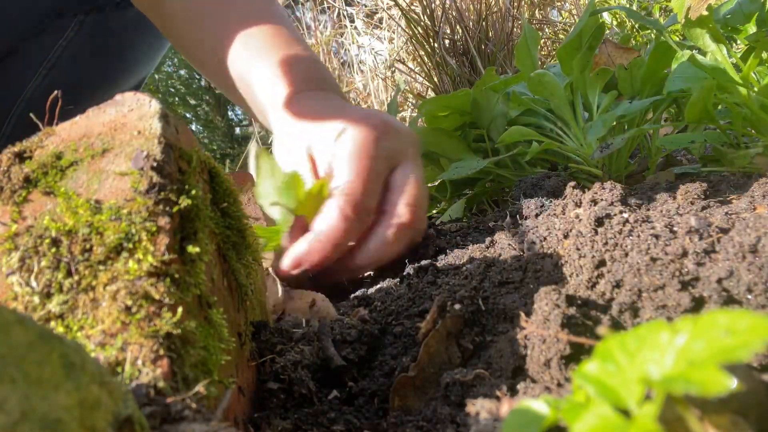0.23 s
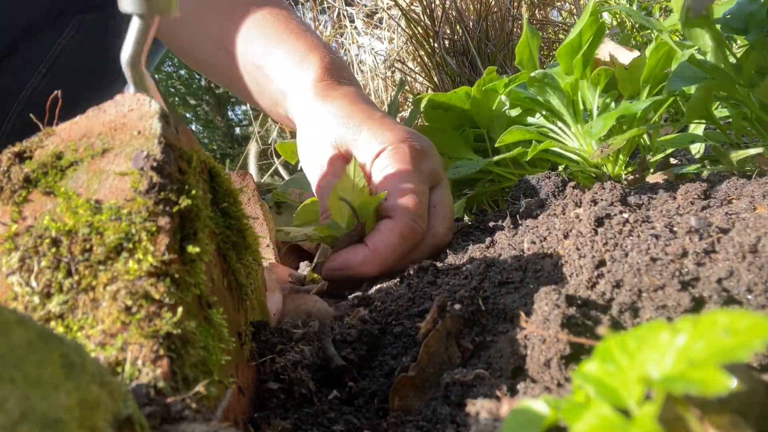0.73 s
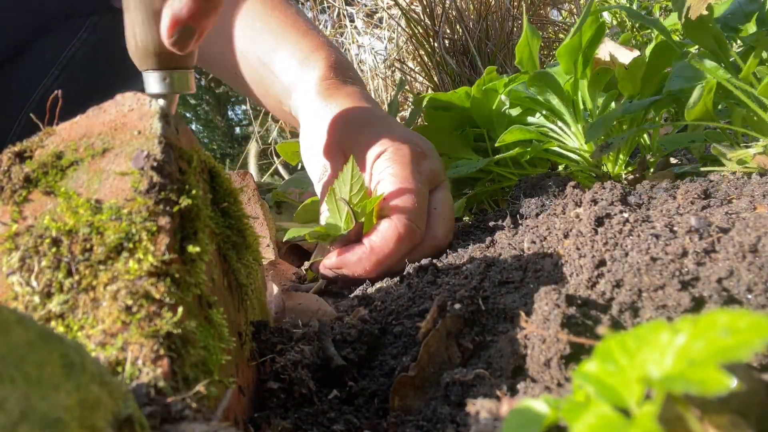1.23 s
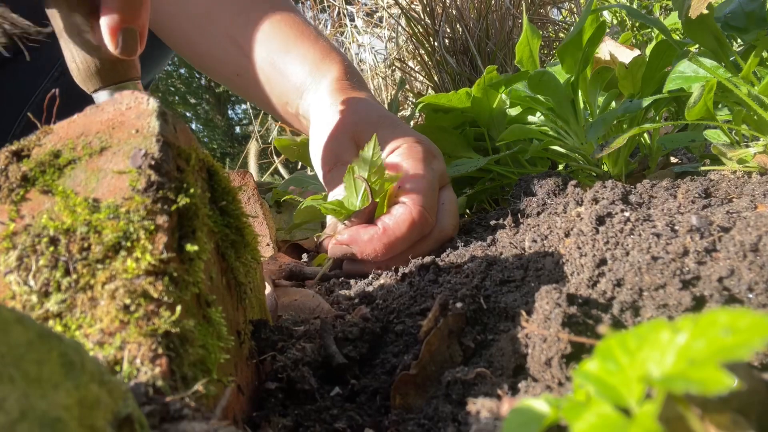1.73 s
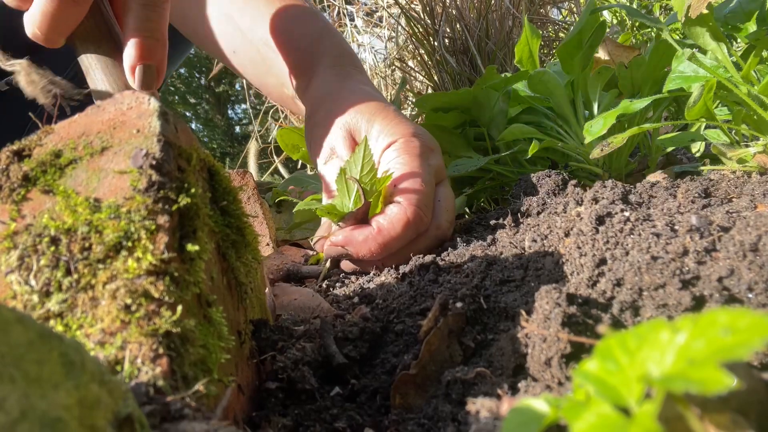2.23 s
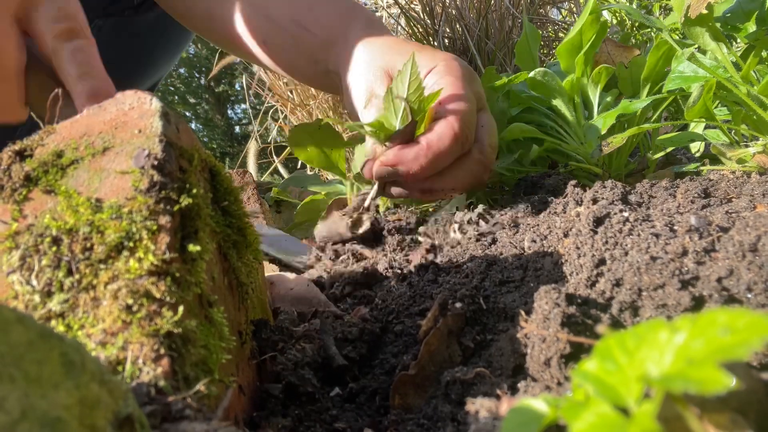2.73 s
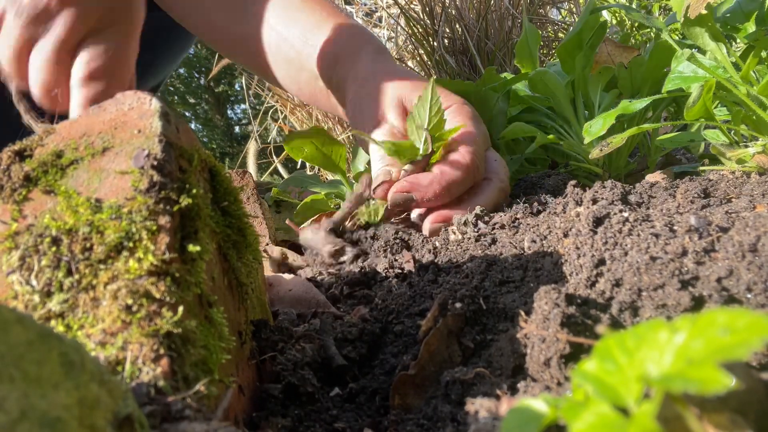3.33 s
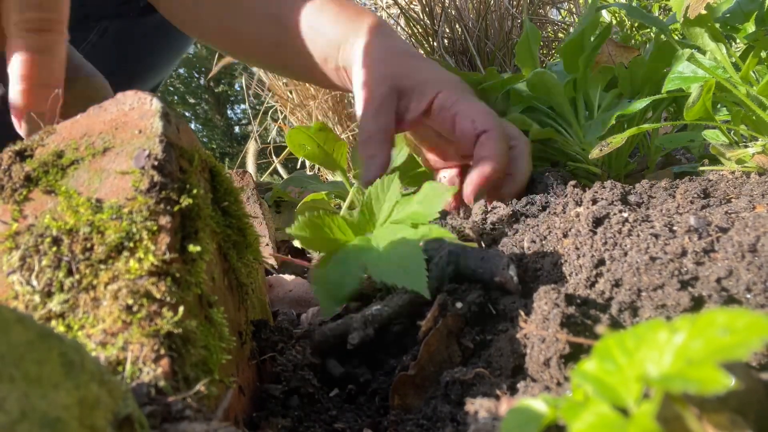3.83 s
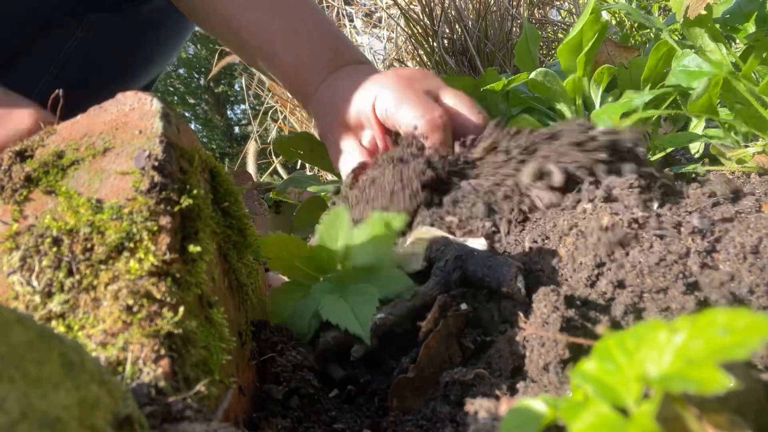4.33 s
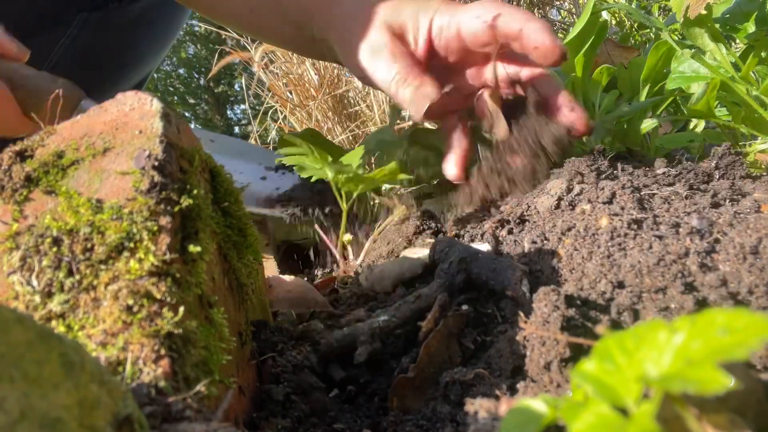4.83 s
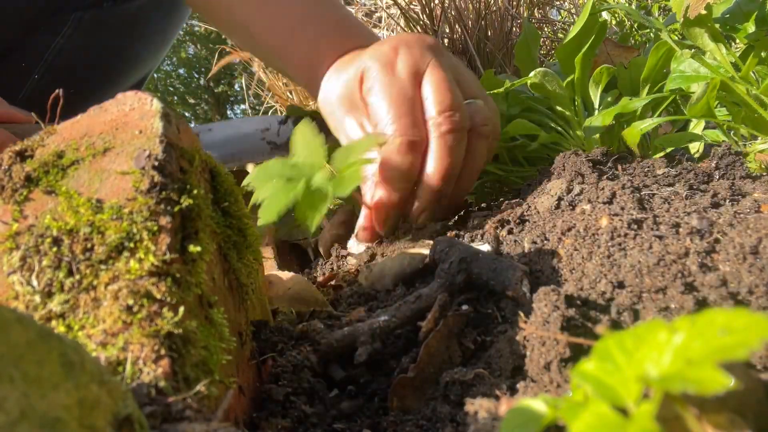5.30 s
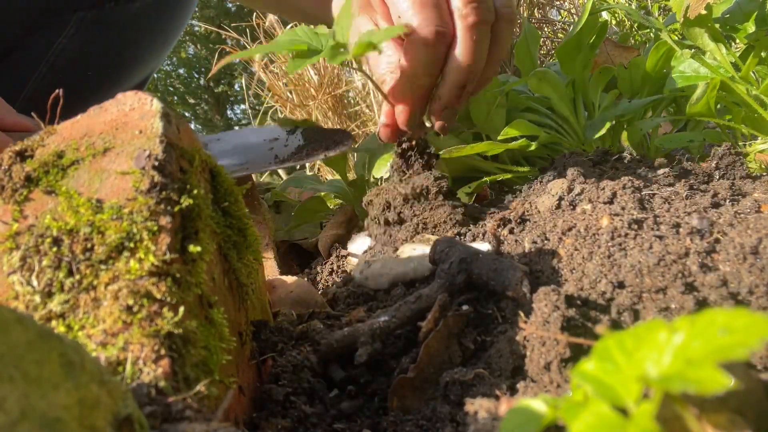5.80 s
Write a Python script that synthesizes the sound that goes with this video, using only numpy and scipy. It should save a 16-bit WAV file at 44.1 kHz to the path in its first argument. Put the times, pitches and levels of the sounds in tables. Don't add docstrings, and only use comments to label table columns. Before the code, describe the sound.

A ground-level, close stereo sound of digging in a garden, over a low, far town rumble and faint airy hush. From 0 s hands rustle gritty soil, with a crisp root snap at 0.14, then a lull. A soft bee drone near 168 Hz hovers, comes nearest around 1.2 and is gone by 2.1. From 0.7 to 1.4 crumbling slides, small snaps and dropping crumbs return, thinning until a very loud, dry crack at 2.5. At 2.9 a trowel clinks on stone; from 3.0 to 4.2 come heavier pushes, dull clods, popping roots, dragging metal and bright pebble ticks. A sharp ringing blade knock lands at 4.62. Thin high whistles at 4.5 lead into a distant songbird's quick, slurred warble from 4.8 to 5.6, with slight tree echo, while a few thuds, a faint soil heave and tiny ticks fade towards 6 s.

```python
import sys
import numpy as np
from scipy import signal
from scipy.fft import rfft, irfft, next_fast_len
from scipy.io import wavfile
from scipy.ndimage import uniform_filter1d

SR = 44100
rng = np.random.default_rng(int(sys.argv[2]) if len(sys.argv) > 2 else 0)


def field_ratio(decibels):
    return 10 ** (np.asarray(decibels, dtype=float) / 20)


def int16_out(signal):
    q = np.round(np.clip(np.atleast_2d(signal).T, -1, 1) * 32767)
    wavfile.write(sys.argv[1], SR, q.astype(np.int16))


N = 267246


def evened(x):
    return x / np.sqrt(np.mean(x ** 2) + 1e-20)


def read(points, hz):
    f, value = np.transpose(points)
    return np.interp(np.log(hz + 1), np.log(f + 1), value)


def add(mix, s, sound):
    part = mix[:, round(s * SR):][:, :sound.shape[1]]
    part += sound[:, :part.shape[1]]


def band(x, lo_hz, hi_hz):
    sos = signal.butter(N=2, Wn=[lo_hz, hi_hz], btype="band", fs=SR, output="sos")
    return signal.sosfilt(sos, x)


def coloured(x, points):
    gain_db = read(points, abs(np.fft.fftfreq(4096, 1 / SR)))
    log_gain = np.log(field_ratio(np.maximum(gain_db, -90)))
    taps = np.fft.ifft(np.exp(np.conj(signal.hilbert(log_gain)))).real[:2048]
    return signal.oaconvolve(x, taps)[:len(x)]


def panned(x, db):
    return x * field_ratio(np.array([[.5], [-.5]]) * db)


def smoothed_noise(n, size):
    return evened(uniform_filter1d(uniform_filter1d(rng.standard_normal(n), size=size), size=size))


def tail(t60_s, length_s, start_s):
    t = np.arange(round(length_s * SR)) / SR
    signs = rng.choice([-1., 1.], (2, len(t)))
    present = (rng.random((2, len(t))) < .06) * (t > start_s)
    taps = signs * present * field_ratio(-60 * t / t60_s)
    return taps / np.linalg.norm(taps, axis=1, keepdims=True)


# t/s, level/dB, left-right/dB
RUMBLE = [(0.0, -34, -0.5), (0.9, -37, 0), (1.2, -38, -2.5), (1.75, -38.5, 1.5), (2.3, -37.5, -0.5),
          (3.07, -37.5, 0), (3.62, -34, -1.5), (4.15, -38, -2.5), (4.75, -38.5, 0), (5.2, -38, -0.5),
          (5.62, -38, 0), (6.06, -35.5, 0)]
# f/Hz, density/dB per Hz
AIR = [(40, -16.5), (54, -1.5), (60, 6), (67, -1.5), (90, -6), (140, -10.5), (170, -12.5), (215, -22.5),
       (310, -21.5), (420, -36), (700, -36.5), (1100, -42.5), (2000, -49), (6500, -59), (8000, -56.5),
       (15000, -81)]
# f/Hz, likeness/1
AIR_SAME = [(40, .52), (90, 0.55), (160, 0.5), (400, 0.3), (2000, 0.1), (10000, 0.4)]
# f/Hz, phase/rad
AIR_LEAD = [(40, 0.5), (90, 0.5), (160, 2.2), (700, 2.96), (2000, 0.87)]


def air():
    hop = 512
    frames, hz = N // hop + 5, np.fft.rfftfreq(2048, 1 / SR)
    a, b, c, d, patches = rng.standard_normal((frames, 1025, 5)).T
    patches = evened(uniform_filter1d(uniform_filter1d(patches, size=10, axis=0), size=6, axis=1))

    same = read(AIR_SAME, hz)[:, None]
    lag = np.exp(-1j * read(AIR_LEAD, hz)[:, None])
    left = a + 1j * b
    right = same * left * lag + np.sqrt(1 - same ** 2) * (c + 1j * d)

    s, db, place_db = np.transpose(RUMBLE)
    swell_db = np.interp(np.arange(frames) * hop / SR, s, db - db.mean())
    bass_swell_db = swell_db / (1 + (hz[:, None] / 250) ** 4)
    z = np.array([left, right]) * field_ratio(read(AIR, hz)[:, None] + 2.43 * patches + bass_swell_db)
    out = signal.istft(z, nperseg=2048, noverlap=2048 - hop)[1][:, :N]
    return panned(field_ratio(db.mean() + 2.0) * evened(out), np.interp(np.arange(N) / SR, s, place_db))


# t/s, length/s, f/Hz, level/dB
WHISTLES = [
    (0.458, 0.089, 4600, -77),
    (0.578, 0.11, 4090, -76.5),
    (4.488, 0.086, 8700, -64.5),
    (4.555, 0.066, 8680, -73),
    (4.633, 0.044, 8280, -63),
    (4.667, 0.04, 8060, -62),
    (4.688, 0.045, 8760, -63.5),
    (5.73, 0.069, 7480, -80),
    (5.762, .06, 8140, -78),
]
# t/s, length/s, start f/Hz, end f/Hz, level/dB
SLURS = [(4.794, 0.044, 3170, 3660, -65), (4.847, 0.026, 3940, 3230, -63.5),
         (4.863, 0.015, 2400, 2760, -72), (4.87, 0.039, 2765, 2815, -56.5), (4.921, 0.048, 3400, 3340, -62),
         (4.962, 0.024, 3400, 3760, -65), (4.979, 0.013, 3730, 4320, -55),
         (4.985, 0.0365, 3900, 4045, -59.5), (4.976, .035, 3350, 3350, -68), (5.021, 0.06, 3395, 3380, -73),
         (5.101, 0.018, 3380, 5050, -64), (5.113, 0.022, 5300, 4760, -52.5),
         (5.13, 0.022, 4790, 5260, -49.5), (5.147, 0.02, 5330, 5480, -59), (5.192, 0.046, 5100, 4820, -78),
         (5.253, 0.013, 4630, 4430, -58), (5.26, 0.0094, 4480, 5510, -63), (5.271, 0.018, 4940, 3120, -55),
         (5.307, 0.015, 3820, 3270, -61), (5.326, 0.013, 3150, 5320, -59),
         (5.402, 0.011, 3500, 4750, -56.5), (5.411, 0.0089, 4450, 3100, -56),
         (5.418, 0.015, 3100, 3690, -57), (5.431, 0.014, 3540, 3000, -56), (5.444, 0.02, 3050, 2820, -66),
         (5.469, 0.013, 3080, 4740, -59), (5.482, .006, 4430, 3200, -64), (5.536, 0.012, 2630, 3800, -63)]
# t/s, length/s, top f/Hz, level/dB
FLICKS = [
    (5.291, 0.022, 3800, -52.5),
    (5.597, 0.022, 3040, -66),
]


def song():
    sag = 0.026
    notes = [(s, n, hz * (1 + sag / 2), hz, hz * (1 - sag / 2), db) for s, n, hz, db in WHISTLES]
    notes += [(s, n, a, (a + b) / 2, b, db) for s, n, a, b, db in SLURS]
    for s, n, top_hz, db in FLICKS:
        foot_hz = 600 + 0.56 * top_hz
        notes.append((s, n, foot_hz, top_hz, foot_hz, db))
    return notes


def bird():
    out = np.zeros((2, N))
    for s, length, *hz, db in song():
        u = np.linspace(0, 2, round(length * SR))
        warble = smoothed_noise(len(u), 160)
        glide_hz = np.polyval(np.polyfit([0, 1, 2], hz, deg=2), u)
        phase = 2 * np.pi * np.cumsum(glide_hz * (1 + .017 * warble)) / SR
        swell = np.sin(np.pi * u / 2) * field_ratio(3.5 * warble[::-1])
        add(out, s, panned(field_ratio(db + 11.5) * swell * np.sin(phase), 5.1))
    trees = signal.oaconvolve(out, tail(.45, .5, .003), axes=1)[:, :N]
    return out + field_ratio(-3.5) * trees


# t/s, wingbeat f/Hz, level/dB
BEE = [
    (0, 168.5, -48),
    (.55, 166.8, -43),
    (1.25, 166.3, -42),
    (1.45, 170.5, -50),
    (1.7, 172, -51),
    (1.98, 168, -49),
    (2.1, 158, -70),
]
# level/dB, left-right/dB, left lead/rad
BEE_TONES = [(0, -4, -2.8), (-17, 3, 1.9), (-30, 4, -2.6)]


def bee():
    s, hz, db = np.transpose(BEE)
    t = np.arange(N) / SR
    waver = smoothed_noise(N, 1500)
    turn = 2 * np.pi * np.cumsum(np.interp(t, s, hz) * (1 + .004 * waver)) / SR
    tones = np.zeros((2, N))
    for multiple, (level_db, place_db, lead) in enumerate(BEE_TONES, 1):
        wave = np.sin(multiple * turn - np.array([[0], [lead]]))
        tones += panned(field_ratio(level_db) * wave, place_db)
    return np.sqrt(2) * field_ratio(np.interp(t, s, db, right=-120) + 1.5 * waver[::-1]) * tones


def drops(rows, cycles):
    out, t = np.zeros((2, N)), np.arange(4000) / SR
    for s, db, hz in rows:
        spread, place = rng.standard_normal(2)
        fade = np.exp(-t * hz * np.log(10) / cycles)
        overtone = 0.17 * np.sin(2 * np.pi * hz * (1.9 + 0.22 * spread) * t) * fade
        ring = (np.sin(2 * np.pi * hz * t) + overtone) * fade
        tick = band(rng.standard_normal(4000) * np.exp(-t / .0006), 1500, 10000)
        add(out, s, panned(field_ratio(db + 3.0) * (ring + 0.34 * tick / abs(tick).max()), 2.5 * place))
    return out


# t/s, peak/dB, f/Hz
CRUMBS = [(.05, -42, 1330), (.174, -40, 2500), (0.71, -38, 1170), (0.744, -31, 1000), (.761, -33.5, 2230),
          (0.793, -39, 2400), (.926, -46, 2000), (0.957, -39, 2600), (.974, -31, 3800),
          (1.022, -33.5, 2600), (1.096, -35, 2850), (1.244, -60, 1050), (1.358, -49, 850),
          (1.415, -43, 1200), (2.514, -38, 950), (2.516, -45, 2100), (2.526, -24, 980), (2.529, -33, 2100),
          (2.929, -42, 2900), (3.006, -35.5, 680), (3.049, -35, 2100), (3.069, -25.5, 1380),
          (3.091, -31, 2000), (3.101, -28, 2040), (3.116, -39, 2100), (3.136, -33, 2010),
          (3.137, -30.5, 4200), (3.169, -42, 2000), (3.263, -56, 900), (3.338, -31.5, 814),
          (3.488, -18.5, 5800), (3.552, -33, 6200), (3.593, -37, 2170), (3.612, -35, 800),
          (3.616, -36, 1400), (3.639, -40, 900), (3.652, -36, 950), (3.687, -39, 1700), (3.692, -43, 800),
          (3.70, -44, 1200), (3.83, -39, 900), (3.871, -42, 1190), (3.994, -31, 2370), (4.071, -34.5, 920),
          (4.199, -44, 1090), (4.211, -39, 2190), (4.247, -53, 900), (4.457, -44, 1320), (4.627, -34, 2360),
          (4.644, -30, 4100), (5.291, -50, 6500), (5.375, -42.5, 1950), (2.4968, -8, 944),
          (3.4395, -24, 720), (3.966, -21.5, 950), (5.5, -41, 600)]
# t/s, peak/dB, f/Hz
PEBBLES = [(1.479, -44.5, 1170), (1.597, -51, 1000), (1.70, -43, 4300), (1.716, -42.5, 4070),
           (2.4975, -19, 2180), (3.376, -34, 1910), (3.44, -33, 2640), (3.44, -37, 6000),
           (3.465, -32, 8600), (3.473, -19, 6040), (3.473, -22.5, 8700), (3.474, -31, 1960),
           (3.487, -36, 8700), (4.002, -35.5, 2420), (4.018, -43, 2450), (4.103, -43, 2950),
           (4.112, -43, 3080), (4.316, -36, 2040), (4.345, -47, 2000), (2.881, -30.5, 1447),
           (4.6225, -16.5, 4260), (4.628, -22, 5100), (5.66, -53, 6000), (5.71, -57, 8500),
           (5.735, -68, 4300), (5.823, -53, 4800), (5.853, -58, 3820)]
# t/s, peak/dB, f/Hz
LUMPS = [(.327, -49, 7800), (.371, -39, 8700), (.394, -41, 8580), (.4655, -47, 8900), (.58, -55, 7700),
         (2.997, -42, 564), (3.058, -40, 415), (3.068, -32.5, 860), (3.072, -41, 400), (3.092, -37, 467),
         (3.097, -43, 1110), (3.131, -42, 490), (3.476, -38, 580), (3.478, -39, 1440), (3.895, -38, 2080),
         (3.947, -41, 516), (3.967, -35.5, 424), (4.313, -36.5, 600), (4.6203, -19, 3050),
         (4.626, -21, 2240)]


def falling_bits():
    return drops(CRUMBS, 3.24) + drops(PEBBLES, 15) + drops(LUMPS, 12.3)


# f/Hz, level/dB, t60/s
BLADE = [(455, -1, .05), (620, -7, .025), (1860, -13, .11), (2288, -4, .025), (2285, -2, .11),
         (2605, -2, .045), (3065, 1, .035), (3058, -11, .14), (4125, -4, .035), (4220, -8, .025),
         (5000, -6, .028), (6110, -10, .025), (6460, -12, .025), (7100, -12, .02), (7650, -14, .025),
         (8450, -11, .02), (9450, -12, .02), (10350, -11, .08)]


def rung(x, tilt_db, edge_db):
    t = np.arange(7000) / SR
    ring = np.zeros(len(t))
    for hz, db, t60_s in BLADE:
        level_db = db + tilt_db * np.log2(max(hz, 1800) / 2300) + edge_db * (3000 < hz < 3100)
        ring += field_ratio(level_db - 60 * t / t60_s) * np.sin(2 * np.pi * hz * t)
    return signal.oaconvolve(x, ring)[:len(x)]


# t/s, peak/dB, tilt/dB per octave, edge modes/dB
KNOCKS = [(2.8843, -23.5, 0, -21), (2.9468, -33.5, 7, -14), (3.055, -34, -10, -8), (3.096, -29, -10, 6),
          (3.472, -37, 10, 0), (3.592, -31, -4, -14), (3.6436, -25.5, -20, -17), (3.678, -36, -59, -14),
          (3.9407, -21.5, 10.5, -14), (4.6207, -7.5, -2.5, 1), (5.0962, -30, 41, -6), (5.499, -42, -38, -7)]


def knocks():
    out, t = np.zeros((2, N)), np.arange(8000) / SR
    for s, db, tilt_db, edge_db in KNOCKS:
        rub = .45 * np.exp(-t / .0008) + .1 * np.exp(-(t / .009) ** 3)
        scrape = 9 * (t == 0) + rng.standard_normal(8000) * rub
        top_hz = np.clip(10000 * 2 ** (tilt_db / 8), 2600, 16000)
        ring = evened(rung(scrape, tilt_db, edge_db)) + 0.43 * evened(band(scrape, 2050, top_hz))
        add(out, s, panned(field_ratio(db + 5.5) * ring / abs(ring).max(), -1.0))
    return out


# t/s, peak/dB, thud re peak/dB, grit re peak/dB
ROOTS = [(0.058, -34.5, -40, -21), (0.143, -13, -33.5, -5), (0.622, -53.5, -22, 11), (0.839, -29, -46, -17),
         (0.871, -31.5, -33.5, -10), (0.916, -29.5, -37, -12), (1.077, -26.5, -43, -11.5),
         (1.109, -32, -37, -6.5), (1.177, -28, -31, -7.5), (1.479, -27, -32, -8.5),
         (1.687, -37.5, -14, -5.5), (1.943, -29, -18.5, -7), (1.964, -25, -25, -5.5),
         (2.252, -33.5, -19.5, -13.5), (2.312, -28.5, -26, -21), (2.346, -31.5, -27, -14),
         (2.525, -28.5, -13, -16), (2.568, -35.5, -17, -14), (2.679, -37, -20, -10), (2.849, -31, -38, -15),
         (3.068, -16.5, -25.5, -19), (3.097, -31, -39, -14), (3.542, -34, -16.5, -2),
         (3.811, -32.5, -15.5, -20), (3.896, -25.5, -21, -14), (4.291, -32.5, -15, -14),
         (4.315, -31, -7.5, -30), (5.353, -41, -12, -26), (5.501, -38.5, -8.5, -6),
         (6.042, -38.5, -27.5, -10)]
# t/s, peak/dB, thud re peak/dB, grit re peak/dB, thud f/Hz
CLODS = [(0.729, -31, -10, -17, 1000), (1.273, -31.5, -4.5, -11, 760), (1.296, -22.5, -23, -28, 473),
         (1.596, -29, -17.5, -14, 500), (2.4965, -4.5, -40, -34, 700), (2.498, -30, 3, -25, 404),
         (2.866, -35, -9, -27, 1110), (2.88, -14, -15.5, -12.5, 830), (3.057, -20, -25, -9.5, 372),
         (3.206, -28.5, -14.5, -26, 477), (3.373, -28, -9, -31, 820), (3.387, -28.5, 1, -25, 815),
         (3.439, -24, -10, -13, 690), (3.472, -20.5, -22, -28, 565), (3.606, -22, -8, -27, 900),
         (3.644, -26.5, 0, -16, 910), (3.678, -39.5, 1.5, -20, 1240), (3.762, -25.5, -16, -14.5, 510),
         (3.938, -29, -21, -9, 456), (3.965, -24, -3.5, -23, 820), (5.095, -41.5, 3, -30, 394),
         (4.1625, -18.5, -18.5, -37, 350), (4.983, -49, -8, -21, 534), (5.094, -32, -4, -3, 1350)]


def snaps():
    out, t = np.zeros((2, N)), np.arange(2048) / SR
    root_thud_hz = 312
    when, *_, place_db = np.transpose(DIG)
    for s, db, thud_db, grit_db, body_hz in [*CLODS, *[(*row, root_thud_hz) for row in ROOTS]]:
        fade = field_ratio(-60 * t / 0.0093) + 0.067 * field_ratio(-60 * t / 0.12)
        burst = coloured(rng.standard_normal(2048) * fade, SOIL)
        thud = band(burst, 0.67 * body_hz, 1.27 * body_hz)
        tear = band(burst, 850, 6140)
        edge = band(burst, 9540, 20000)
        snap = sum(field_ratio(level_db) * part / abs(part).max() for level_db, part in
                   ((thud_db + 9.5, thud), (-2.5, tear), (grit_db + 6.0, edge)))
        add(out, s, panned(field_ratio(db) * snap, np.interp(s, when, place_db)))
    return out


def layers(effort_db, fine_db):
    thud_db = effort_db - 2 - 0.42 * fine_db
    crumble_db = effort_db - 1.86
    grit_db = effort_db - 2.2 + 0.92 * fine_db
    return field_ratio(np.array([thud_db, crumble_db, grit_db]))


def grit(per_s, spread_db, clump_db):
    clumps = evened(uniform_filter1d(rng.standard_normal(N), size=500))
    size = field_ratio(spread_db * np.minimum(rng.exponential(1, N), 3.5)) * (rng.random(N) < per_s / SR)
    clicks = evened(size * rng.standard_normal(N))
    return field_ratio(clump_db * clumps) * (clicks + 0.68 * rng.standard_normal(N))


# t/s, effort/dB, fineness/dB, left-right/dB
DIG = [(0.0, -51.5, -4.5, -15), (0.27, -52, 4, -1.5), (0.48, -88.5, 27, 12), (0.66, -77.5, 4, -10),
       (0.8, -55.5, -7, -4.5), (1.04, -53.5, -0.5, -6.5), (1.4, -58.5, -6, 2.5), (2.04, -59.5, -0.5, -3.5),
       (2.3, -64.5, -4.5, -0.5), (2.7, -55, 0, -10), (2.92, -65.5, -4, -1.5), (3.08, -49.5, -2.5, -3),
       (3.5, -54.5, 1.5, -2), (3.68, -63, -1.5, 2.5), (3.91, -49.5, -2.5, -4.5), (4.42, -53.5, 1, -4),
       (4.58, -63, 0, 6.5), (6.06, -70.5, -4, -1.5)]
# f/Hz, density/dB per Hz
SOIL = [(150, -14), (300, -2.5), (500, -2), (900, 1), (1600, -7), (2400, -11), (3500, -11), (4100, -4),
        (6000, -7.5), (8500, -12), (10500, -10.5), (14500, -25.5)]
# t/s, length/s, effort/dB, fineness/dB
HEAVES = [
    (2.97, 0.21, -48, -2),
    (3.3, 0.23, -50, 0),
    (4.03, 0.25, -59.5, -28),
    (5.09, 0.62, -64.5, -15),
    (1.61, 0.23, -68, -9),
]
# t/s, length/s, effort/dB, fineness/dB
SLIDES = [(0.054, 0.015, -54.5, 4), (0.136, 0.056, -41.5, 2.5), (0.67, 0.14, -45, 0), (.91, 0.022, -48, -7),
          (0.935, 0.18, -52, -3), (1.27, 0.065, -41, -2), (1.382, 0.061, -47, -1.5),
          (1.904, 0.094, -54.5, 0.5), (2.482, 0.015, -40.5, -2.5), (2.506, 0.086, -58, -1),
          (3.043, 0.043, -41.5, -5), (3.082, 0.037, -53, 6), (3.117, 0.024, -49.5, -8),
          (3.367, 0.022, -38.5, -3.5), (3.458, 0.04, -41.5, 5), (3.59, 0.017, -50, 13),
          (3.639, 0.063, -55.5, 1.5), (3.87, 0.065, -51, 8), (3.931, 0.045, -50.5, -13),
          (3.962, 0.079, -46.5, -1), (4.158, 0.018, -40.5, -9.5), (4.298, 0.064, -58, -2),
          (4.619, 0.021, -37, -4), (4.634, 0.092, -53, -7), (4.835, 0.012, -61, 8),
          (4.972, 0.017, -53.5, -2), (5.093, 0.02, -46.5, -19), (5.156, 0.017, -51.5, 8.5),
          (5.289, 0.0069, -52.5, -4)]


def digging():
    blade_in_s, blade_out_s = 2.86, 4.12
    drag_db, drag_tilt_db, drag_edge_db = -10, 3., -25.0
    s, effort_db, fine_db, _ = np.transpose(DIG)
    t = np.arange(N) / SR
    gains = layers(np.interp(t, s, effort_db), np.interp(t, s, fine_db))
    for moves, edge_share in (HEAVES, 0.85), (SLIDES, 0.65):
        for s, length, *db in moves:
            swell = signal.windows.tukey(round(length * SR), edge_share)
            add(gains, s, layers(*db)[:, None] * swell)

    slips = grit(per_s=3500, spread_db=2.9, clump_db=1.1)
    earth = coloured(slips, SOIL)
    hand_thud = 0.56 * evened(band(earth, 620, 1820))
    blade_thud = evened(band(earth, 200, 1566))
    thud = np.where(t < blade_in_s, hand_thud, blade_thud)
    drag = (t > blade_in_s) * (t < blade_out_s) * evened(rung(slips, drag_tilt_db, drag_edge_db))
    crumble = evened(band(earth, 1127, 4430)) + field_ratio(drag_db) * drag
    hiss = evened(band(earth, 6720, 18200))
    return panned((gains * [thud, crumble, hiss]).sum(0), -0.52)


def shifting(x, patchy_db):
    z = signal.stft(x, nperseg=256, noverlap=192)[2]
    patches = uniform_filter1d(rng.standard_normal(z.shape), size=5, axis=1)
    patches = uniform_filter1d(patches, size=40, axis=2)
    gain = field_ratio(patchy_db * evened(patches + 0.041 * patches[::-1]))
    return signal.istft(z * gain, nperseg=256, noverlap=192)[1][:, :N]


def at_ports(x, ports):
    size = next_fast_len(N + 1024)
    f, lead = np.transpose(ports)
    turn = np.exp(-1j * np.interp(np.fft.rfftfreq(size, 1 / SR), f, lead))
    x = np.array([x[0], irfft(rfft(x[1], size) * turn, size)[:N]])
    return x + field_ratio(-9.) * signal.oaconvolve(x, tail(.03, .05, .0008), axes=1)[:, :N]


# f/Hz, left lead/rad
HAND_PORTS = [(0, 6.28), (260, 5.9), (450, 5.5), (620, 3.9), (1890, 6.7), (2580, 6.1), (3500, 4.2),
              (4200, 4.6), (5200, 4.5), (5900, 4.1), (7670, 6.1), (9560, 6.5), (11300, 9.5), (16200, 11.3)]
# f/Hz, left lead/rad
BLADE_PORTS = [(0, 0), (340, -4.0), (1210, -1.2), (2410, -7.2), (2840, -2.5), (4390, 0.0), (4740, -2.8),
               (5860, -1.3), (6200, -3.5), (6980, 4.3), (7580, 5.7), (13400, 10.4), (14100, 12.4),
               (16200, 12.3)]


def scene():
    far = air() + bird()
    bits = at_ports(falling_bits(), HAND_PORTS)
    blade = at_ports(knocks(), BLADE_PORTS)
    hands = at_ports(shifting(digging(), 4.0) + snaps(), HAND_PORTS)
    return far + bee() + bits + blade + hands


# f/Hz, gain/dB
MIX_COLOUR = [(20, -50.5), (32, -34), (48, 6.5), (60, -1.5), (10800, -2), (11050, -6), (12000, -8), (12850, -10),
              (13150, 8), (15750, 8), (16100, -30), (16600, -34), (16750, -85)]


def mix_coloured(dry):
    return np.array([coloured(x, MIX_COLOUR) for x in dry])


# f/Hz, gain/dB
SIDE_COLOUR = [(6500, 0), (7500, 1), (9600, -2), (10800, -0.5), (11100, 8), (12000, 9.5), (12850, 9),
               (13200, -2.5), (15000, -12)]


def gated(x, under_db):
    z = signal.stft(np.array([x[0] + x[1], x[0] - x[1]]) / 2, nperseg=2048, noverlap=1024, window="cosine")[2]
    z[1] *= field_ratio(read(SIDE_COLOUR, np.arange(1025) * SR / 2048))[:, None]
    db = 10 * np.log10((abs(z[:, :1024]) ** 2).reshape(2, 64, 16, -1).mean(2) + 1e-20)
    frames = db.shape[2]
    wobble_db = 1.8 * rng.standard_normal((2, 1, frames)) * (np.arange(64)[:, None] > 28)
    weak = db < uniform_filter1d(db, size=15, axis=1) - under_db - wobble_db
    weak[:, 38:] |= db[:, 38:] < np.percentile(db[:, 38:46], 14)
    for lo, hi in (22, 28), (41, 64):
        weak[1, lo:hi] |= db[1, lo:hi] < np.percentile(db[1, lo:min(hi, 46)], 88)
    thrift = evened(uniform_filter1d(rng.standard_normal(frames), size=2))
    weak[0, 32:38] = thrift + np.hanning(8)[1:-1, None] > -.35
    weak[:, :8] = False
    treble_db = db[:, 8:32].mean((0, 1))
    weak[:, :, 1:] &= np.diff(treble_db) < 4.
    z[:, :1024] *= ~np.repeat(weak, 16, axis=1)
    mid, side = signal.istft(z, nperseg=2048, noverlap=1024, window="cosine")[1][:, :N]
    return np.array([mid + side, mid - side])


def top_cut(x):
    return signal.sosfilt(signal.butter(12, 16640, fs=SR, output="sos"), x)


def record(dry):
    heard = gated(mix_coloured(dry), under_db=5.3)
    return top_cut(heard)


dry = scene()
out = record(dry)
int16_out(out)
```